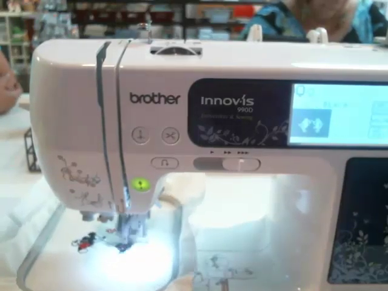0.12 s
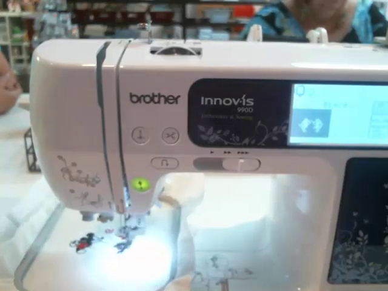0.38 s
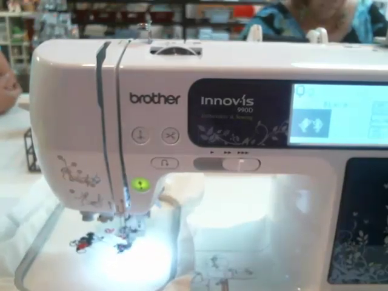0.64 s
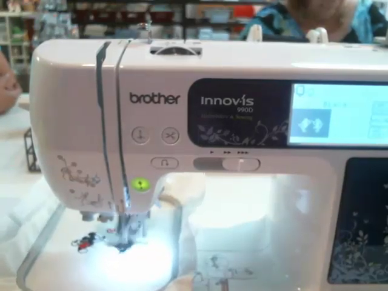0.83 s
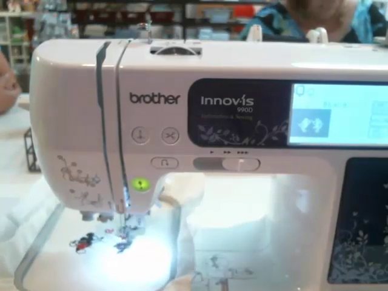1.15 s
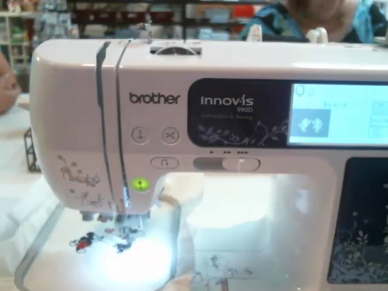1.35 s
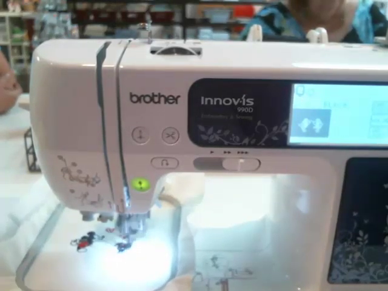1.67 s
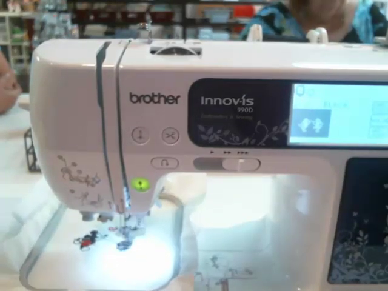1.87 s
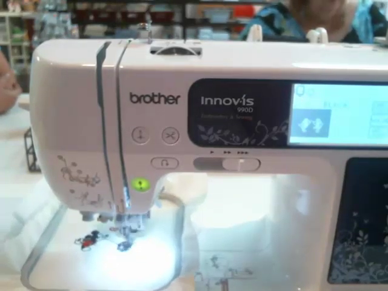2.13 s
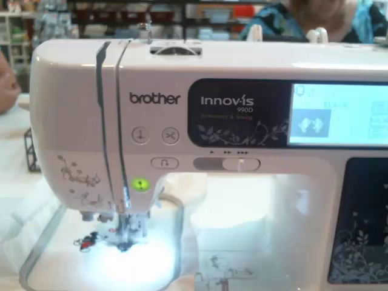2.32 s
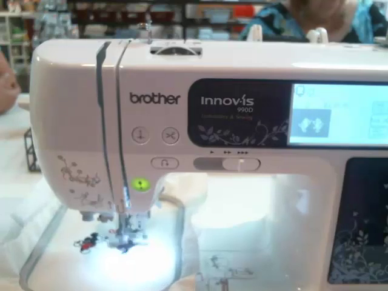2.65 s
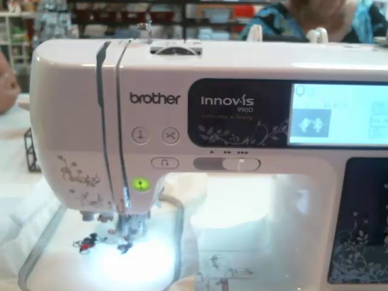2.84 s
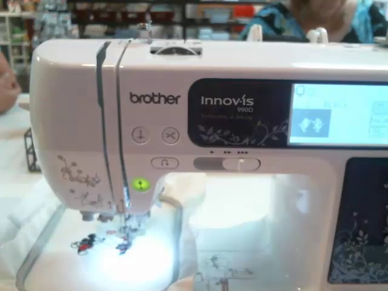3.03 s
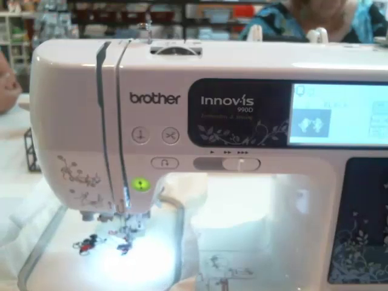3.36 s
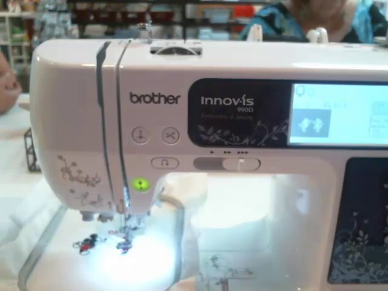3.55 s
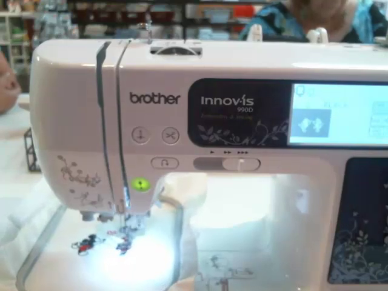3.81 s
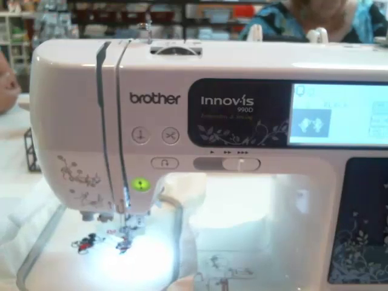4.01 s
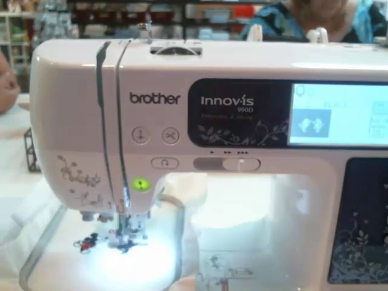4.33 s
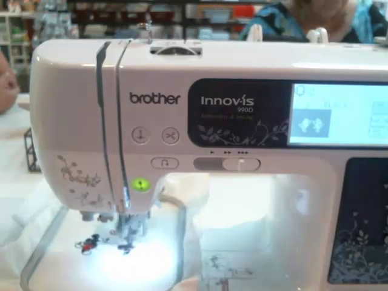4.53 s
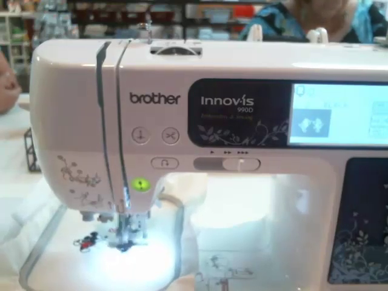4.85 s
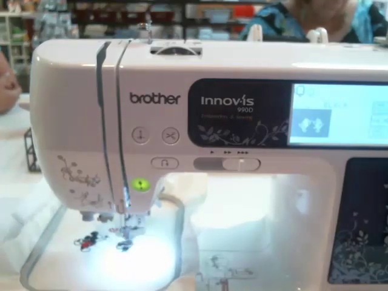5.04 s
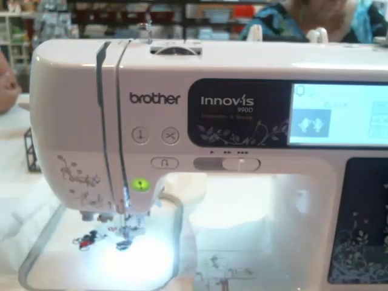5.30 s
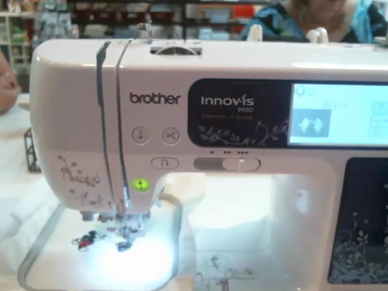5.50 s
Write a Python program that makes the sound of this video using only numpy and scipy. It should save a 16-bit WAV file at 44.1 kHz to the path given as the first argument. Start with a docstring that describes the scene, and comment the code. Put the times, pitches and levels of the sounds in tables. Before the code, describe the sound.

An embroidery machine is already stitching at the start and keeps the same fast, even pace, nearly seven stitches a second, until the end at about 5.6 seconds. Each stitch is a dull, boxy needle knock joined by a clatter of steel parts and plastic casing, and a short low growling buzz as the hoop jerks on. A steady motor whine and gear rumble run underneath, with faint irregular metallic ticks. The thread snaps tight on every stroke, more sharply around 0.1, 0.9, 1.8, 2.8, 3.9, 4.2 and 4.9 seconds. Small clicks flick against the case, most clearly near 0.5 and 2.6 seconds. A few stitches thud a little harder, near 1.1 and 2.0 seconds and especially at 4.6 seconds. The machine is heard close up in a furnished indoor room with very little echo and a faint low room tone.

```python
"""An embroidery machine sews 6.7 stitches a second, close by in a furnished studio.
On each turn of the main shaft the needle bar and foot knock, loose joints clatter in the plastic case,
the thread snaps tight and stepper motors jerk the hoop on. Bobbin, foot and thread add small ticks.
Underneath, the motor whines and the gear train rumbles throughout, over a low room tone."""
import sys
import numpy as np
from scipy import signal
from scipy.fft import rfft, irfft
from scipy.io import wavfile
from scipy.ndimage import uniform_filter1d

SR = 44100
rng = np.random.default_rng(int(sys.argv[2]) if len(sys.argv) > 2 else 0)


def pcm_store(signal):
    """Save signal as 16-bit PCM."""
    levels = np.round(np.clip(np.atleast_2d(signal), -1, 1) * 32767)
    wavfile.write(sys.argv[1], SR, levels.astype(np.int16).T)


N = 250047
TIME = np.arange(N) / SR
TURN_S, FIRST_STITCH_S = .14937, .0871  # one stitch on every turn of the shaft
STITCH_S = FIRST_STITCH_S + TURN_S * np.arange(int(N / SR / TURN_S) + 1)


def undb(db):
    """Decibels to gain."""
    return 10 ** (np.asarray(db) / 20)


def level(x, db):
    """Scale to an rms level."""
    return x * undb(db) / np.sqrt(np.mean(x ** 2))


def add(track, start_s, sound):
    """Mix a sound into a track at a time."""
    i = int(round(start_s * SR))
    lo, hi = max(i, 0), min(i + len(sound), N)
    if hi > lo:
        track[lo:hi] += sound[lo - i:hi - i]


def colour(x, points, peaks=(), size=8192):
    """EQ through (freq_hz, gain_db) points, with resonances on top."""
    f = np.maximum(np.fft.rfftfreq(size, 1 / SR), 1)
    hz, db = np.transpose(points)
    curve = np.interp(np.log(f), np.log(hz), db) - 20 * np.log10(np.maximum(hz[0] / f, 1))
    for centre, width, lift in peaks:
        curve = curve + lift / (1 + (2 * (f - centre) / width) ** 2)
    # minimum phase: nothing rings ahead of a hit
    cepstrum = irfft(np.log(undb(curve)))
    cepstrum[1:size // 2] *= 2
    cepstrum[size // 2 + 1:] = 0
    return signal.fftconvolve(x, irfft(np.exp(rfft(cepstrum))))[:N]


def turning_noise(repeat):
    """Roughness of meshing parts: the repeat share loops on every turn, the rest is new."""
    size = round(TURN_S * SR)
    turn = level(irfft(np.exp(2j * np.pi * rng.random(size // 2 + 1)), size), 0)
    return np.sqrt(repeat) * np.resize(turn, N) + np.sqrt(1 - repeat) * rng.standard_normal(N)


def burst(decay_s, rise_s, size=3000):
    """Power envelope of a loose part's bouncing: it builds up and dies away."""
    t = np.arange(size) / SR
    return (np.exp(-t / decay_s) * (1 - np.exp(-t / rise_s))) ** 2


def ping(hz, decay_s, rise_s, ring_db, q=9, size=3000):
    """One bounce of a small part, which favours one of its resonances."""
    contacts = np.sqrt(burst(decay_s, rise_s)) * rng.standard_normal(size)
    return contacts + undb(ring_db) * signal.lfilter(*signal.iirpeak(hz, q, fs=SR), contacts)


# bass-heavy EQ of the room: freq_hz, gain_db
ROOM_EQ = [(10, -24), (23, -1), (38, -12.5), (65, -11), (90, -14), (150, -20.5), (500, -23), (2000, -30.5),
           (8000, -44.5), (16000, -56)]


def room_tone():
    """The room rumbles, low and steady."""
    return colour(rng.standard_normal(N), ROOM_EQ)


# dark EQ of the gears: freq_hz, gain_db
GEAR_EQ = [(50, -15), (80, -15), (97, -5.5), (125, -5.5), (150, -5), (250, -5), (450, -7), (630, -13.5),
           (780, -13.5), (1000, -10), (1400, -25.5), (4300, -31), (10500, -43.5), (15000, -64)]
# ring of the metal parts: centre_hz, width_hz, gain_db
METAL_RING = [(1176, 45, 3), (1426, 45, 5.5), (1735, 48, 6.5), (2550, 41, 3), (2905, 67, 7), (3960, 390, 3),
              (4280, 71, 6), (6005, 190, 5.5), (7250, 210, 2.5), (9160, 180, 4.5)]
# hollow of the case, with dips where its panels cancel: centre_hz, width_hz, gain_db
CASE_HOLLOW = [(94.3, 11.4, 7), (115.5, 9.4, 10), (255, 21, 3), (402.7, 16, -10), (437, 17, 4.5),
               (632, 17, -13.5), (680, 39, -9)]


def gear_train(flicker_db=1.1):
    """Belt, cams and bearings make a bed of rumble and hiss."""
    flicker = level(uniform_filter1d(rng.standard_normal(N), size=200), 0)
    grind = turning_noise(repeat=0.3) * undb(flicker_db * flicker)
    return colour(grind, GEAR_EQ, METAL_RING + CASE_HOLLOW)


# tones of the motor and gear teeth: pitch_hz, level_db
WHINE_TONES = [(422, -10), (704, -12.5), (784, -15.5), (879, 0), (938, -10), (1004, -17.5), (1775, -25),
               (4360, -20)]


def motor_whine(catch_s=0.0655, dip_s=0.0072, slip_cycles=.25, slip_spread=0.121,
                sway=0.0049, flutter=0.0077):
    """Tooth tones sway with the load; once a turn the drive catches, and they duck and slip in phase."""
    turns = (TIME - catch_s) / TURN_S
    catches = np.floor(turns).astype(int) + 1
    from_catch_s = (turns - np.round(turns)) * TURN_S
    duck = 1 - np.exp(-(from_catch_s / dip_s) ** 2)
    shake = uniform_filter1d(uniform_filter1d(rng.standard_normal(N), size=150), size=150)
    speed = 1 + sway * np.sin(2 * np.pi * turns) + flutter * level(shake, 0)
    shaft_s = np.cumsum(speed) / SR
    whine = np.zeros(N)
    for hz, db in WHINE_TONES:
        slips = slip_cycles + slip_spread * rng.standard_normal(catches[-1] + 1)
        lag = uniform_filter1d(np.cumsum(slips)[catches], size=250)
        whine += undb(db) * np.sin(2 * np.pi * (hz * shaft_s - lag))
    return duck * whine


def rattle(power, eq, repeat):
    """Dense tiny contacts follow a power envelope and ring the metal parts."""
    return colour(np.sqrt(power) * turning_noise(repeat), eq, METAL_RING)


# bright EQ of small steel parts: freq_hz, gain_db
STEEL_EQ = [(500, -40), (1200, 2.5), (2700, 1), (3400, -3.5), (4500, -1), (7000, -3), (9000, -6.5),
            (11000, -9.5), (13000, -21), (16000, -46)]


def bobbin_ticks(count=110, scatter_db=3):
    """The bobbin jiggles in its race with faint irregular ticks."""
    power = np.zeros(N)
    for s, size in zip(rng.random(count) * N / SR, np.clip(rng.standard_normal(count), -2, 2)):
        add(power, s, undb(scatter_db * size) ** 2 * burst(decay_s=0.0031, rise_s=0.00026))
    return rattle(power, STEEL_EQ, repeat=0)


def drive_catch(catch_s=.0588, pitch_hz=425, width_s=0.005):
    """A short low buzz as the drive takes up the load before each stroke."""
    t = (TIME - catch_s + TURN_S / 2) % TURN_S - TURN_S / 2
    return np.exp(-(t / width_s) ** 2) * np.sin(2 * np.pi * pitch_hz * t)


# stitches on which the needle and hoop thud harder: start_s, boost_db
ACCENTS = [(1.133, 1.5), (2.029, 1.5), (4.568, 3.5), (4.718, 1.7)]


def accent_db(start_s):
    """Extra weight of the stitch that starts at this time."""
    return sum(db for heavy_s, db in ACCENTS if abs(heavy_s - start_s) < TURN_S / 2)


# push of the hoop's steppers within a stitch: delay_s, level_db
HOOP_ENVELOPE = [(-.012, -22.5), (0, -4.5), (.016, 1.5), (.027, 1), (0.042, -5), (.049, 5.5), (0.057, -9.5),
                 (0.067, -10), (0.086, -32)]
# low growl of the carriage: freq_hz, gain_db
HOOP_EQ = [(50, -28.5), (80, -26), (97, -3), (160, -11), (240, -4.5), (300, 0), (380, 2.5), (480, -8),
           (560, -2), (660, -22), (1000, -8.5), (1500, -56.5)]


def hoop_steps(moves_db):
    """The steppers jerk the hoop to the next point and its carriage growls."""
    drive = np.zeros(N)
    delay, db = np.transpose(HOOP_ENVELOPE)
    move = undb(np.interp(np.arange(delay[0], delay[-1], 1 / SR), delay, db))
    for s, hoop_db in zip(STITCH_S, moves_db):
        add(drive, s + delay[0], undb(hoop_db) * move)
    return colour(drive * turning_noise(repeat=0.21), HOOP_EQ, CASE_HOLLOW)


# joints that chatter on every stitch: delay_s, rattle_db, click_db, decay_s
LOOSE_JOINTS = [(-.009, -7.5, -17.5, 0.0059), (-.002, -11, -15, .005), (.0005, 2, 3, 0.005),
                (.006, 1, -3, 0.0065), (.0095, 1.5, 4.5, 0.0071), (0.0126, -2.5, -5, 0.012),
                (.022, -6, 0, 0.013), (0.033, -4.5, -7, 0.0081), (0.042, 1.5, -8.5, 0.0059),
                (0.061, -24, -4, 0.0014), (.068, -7.5, -28, 0.0036), (.076, -32, -22, 0.0025),
                (.099, -37, -12, 0.0017), (0.124, -8, -36, 0.0071)]
# slow level ride on the clatter: time_s, level_db
CLATTER_RIDE = [(.1, 2), (.5, 3.3), (.9, -0.7), (1.6, 4), (2.4, 0.5), (3.4, 1.4), (4.8, 3), (5.6, 0.5)]
# boxy EQ of the plastic case: freq_hz, gain_db
PLASTIC_EQ = [(200, -21), (400, 2), (700, -3), (1050, 2), (1400, -5.5), (2000, -3), (2800, -2.5),
              (3300, -11), (4300, -7), (5200, -10.5), (7000, -25), (10500, -41), (13000, -74), (16000, -75)]


def linkage_clatter(scatter_db=2.86, jitter_s=0.00024, steel_db=-3):
    """Each joint takes up its play once a turn: steel clicks at once, the plastic case rattles after."""
    plastic, steel = np.zeros(N), np.zeros(N)
    for s, ride_db in zip(STITCH_S, np.interp(STITCH_S, *np.transpose(CLATTER_RIDE))):
        for delay, rattle_db, click_db, decay_s in LOOSE_JOINTS:
            size, late = rng.standard_normal(2)
            start_s, db = s + delay + jitter_s * late, ride_db + scatter_db * size
            add(plastic, start_s, undb(db + rattle_db) ** 2 * burst(decay_s, rise_s=0.0029))
            add(steel, start_s, undb(db + click_db) ** 2 * burst(decay_s, rise_s=0.00095))
    case_rattle = level(rattle(plastic, PLASTIC_EQ, repeat=0.14), 0)
    return case_rattle + level(rattle(steel, STEEL_EQ, repeat=0.21), steel_db)


# the presser foot's landing and lift in every stitch: delay_s, level_db
FOOT_HITS = [(.0008, 2), (0.0448, -4)]
# thin, airy EQ of its ticks: freq_hz, gain_db
FOOT_EQ = [(2000, -26), (7000, -5), (10500, 2), (12400, -6), (14200, -10), (16000, -26)]


def foot_ticks(scatter_db=2, decay_s=0.0032, rise_s=.0013):
    """The presser foot gives a bright tick as it lands on the cloth and as it lifts."""
    power = np.zeros(N)
    for s in STITCH_S:
        for (delay, db), size in zip(FOOT_HITS, rng.standard_normal(len(FOOT_HITS))):
            add(power, s + delay, undb(db + scatter_db * size) ** 2 * burst(decay_s, rise_s))
    return rattle(power, FOOT_EQ, repeat=.2)


# blows of the linkage in every stitch: delay_s, level_db, contact_s
BLOWS = [(.0022, -9.5, 0.0011), (.0058, -1.5, 0.00091), (0.0101, -3, 0.00071), (0.0237, -9, 0.002),
         (0.043, -6.5, .001), (.0510, -13.5, 0.00058)]
# ringing modes of the arm and bed: pitch_hz, level_db, t60_s
BODY_MODES = [(100, -4.5, 0.52), (122.6, -21, 0.47), (202, -5.5, 0.092), (247.8, 1, 0.13),
              (282, -3.5, 0.066), (319, 8, 0.074), (357.3, 1.5, 0.26), (442, -8, 0.082), (446, -18, 0.19),
              (550, 1, 0.022), (649.3, -2.5, 0.13), (718, -7, 0.12), (770, -10, 0.017), (920, 4, 0.014),
              (1095, -13, 0.029)]


def needle_knocks(scatter_db=0.4, stitch_scatter_db=1.3, jitter_s=0.0001, rise_s=0.00039, low_cut_hz=85):
    """Needle bar, foot and take-up lever knock the arm at set shaft angles, and its modes ring."""
    force, t = np.zeros(N), np.arange(SR // 3) / SR
    for s in STITCH_S:
        stitch_db = accent_db(s) + stitch_scatter_db * rng.standard_normal()
        for delay, db, contact_s in BLOWS:
            size, late = rng.standard_normal(2)
            push = np.sin(np.pi * np.minimum(t[:SR // 100] / contact_s, 1)) ** 2 / contact_s
            add(force, s + delay + jitter_s * late, undb(stitch_db + db + scatter_db * size) * push)
    ring = sum(undb(db) * np.exp(-np.log(1000) * t / t60) * np.sin(2 * np.pi * hz * t)
               for hz, db, t60 in BODY_MODES)
    # the blow takes a moment to spread over the panels, which are too small to radiate deep bass
    ring *= 1 - np.exp(-t / rise_s)
    ring = signal.sosfilt(signal.butter(4, low_cut_hz, "high", fs=SR, output="sos"), ring)
    return signal.fftconvolve(force, ring)[:N]


# chirp of the hoop's steppers within a stitch: delay_s, pitch_hz, level_db
STEPPER_GLIDE = [(.010, 329.7, -33), (0.019, 336, -2), (0.03, 239.8, 0), (.038, 280.6, -4),
                 (.047, 386.4, -1), (0.054, 526, -3), (0.064, 563, -44)]


def stepper_tone(moves_db, speed_spread=0.0822):
    """The step rate sags, then glides up; it differs with the length of each stitch."""
    tone = np.zeros(N)
    delay, hz, db = np.transpose(STEPPER_GLIDE)
    t = np.arange(delay[0], delay[-1], 1 / SR)
    steps = np.cumsum(np.interp(t, delay, hz)) / SR
    envelope = undb(np.interp(t, delay, db))
    for s, hoop_db in zip(STITCH_S, moves_db):
        speed = 1 + speed_spread * rng.standard_normal()
        add(tone, s + delay[0], undb(hoop_db) * envelope * np.sin(2 * np.pi * steps * speed))
    return tone


# hard snaps, each in place of its stitch's usual one: start_s, level_db, pitch_hz
SNAP_ACCENTS = [(.116, 8, 6700), (0.567, 5.5, 6620), (.860, 8.5, 5900), (1.609, 3.5, 4010),
                (1.761, 11.5, 2930), (2.810, 11, 5500), (3.404, 6, 7230), (3.852, 8.5, 6900),
                (3.994, 7, 4280), (4.157, 9, 2940), (4.3, 4, 7450), (4.898, 8, 2880), (5.047, 6, 7060)]


def thread_snaps(delay_s=0.029, jitter_s=.005, scatter_db=4.0, ring_hz=3900, spread_octaves=0.72):
    """On each stitch the loop slips off the hook and is pulled tight, ringing a guide or spring."""
    hits = np.zeros(N)
    for s in STITCH_S:
        late, size, pitch = np.clip(rng.standard_normal(3), -2, 2)
        usual = (s + delay_s + jitter_s * late, scatter_db * size, ring_hz * 2 ** (spread_octaves * pitch))
        start_s, db, hz = next((snap for snap in SNAP_ACCENTS if s < snap[0] < s + TURN_S), usual)
        add(hits, start_s, undb(db) * ping(hz, decay_s=0.007, rise_s=0.0016, ring_db=5))
    return colour(hits, STEEL_EQ)


# the loudest flicks against the case: start_s, level_db, pitch_hz
LOUD_FLICKS = [(0.452, -6, 4220), (2.6205, -4, 4290), (3.219, -8, 4400), (4.113, -9, 3090)]


def stray_clicks(faint_count=12, faint_db=-12, scatter_db=1.5, ring_hz=3400, spread_octaves=.35):
    """Now and then the thread or the hoop flicks against the case, mostly faintly."""
    hits, flicks = np.zeros(N), list(LOUD_FLICKS)
    for s in rng.random(faint_count) * N / SR:
        size, pitch = np.clip(rng.standard_normal(2), -2, 2)
        flicks.append((s, faint_db + scatter_db * size, ring_hz * 2 ** (spread_octaves * pitch)))
    for s, db, hz in flicks:
        add(hits, s, undb(db) * ping(hz, decay_s=0.012, rise_s=0.001, ring_db=1))
    eq = [(400, -22), (900, 3), (2500, -5.0), (4500, -6.5), (8000, -13.5), (12000, -27), (16000, -42)]
    return colour(hits, eq)


def studio(x, t60_s=0.25, wet_db=-18, predelay_s=.004):
    """The table and shelves add a short diffuse echo."""
    t = np.arange(SR // 2) / SR
    tail = rng.standard_normal(len(t)) * np.exp(-np.log(1000) * t / t60_s) * (t > predelay_s)
    echo = signal.fftconvolve(x, tail / np.sqrt(np.sum(tail ** 2)))[:N]
    return x + undb(wet_db) * colour(echo, [(80, -5), (1000, -1), (4000, -3), (12000, -28)])


def scene(move_scatter_db=.5):
    """Mono mix of thuds and clicks over the drive and room tone; each hoop move has its own weight."""
    moves_db = [accent_db(s) + move_scatter_db * rng.standard_normal() for s in STITCH_S]
    thuds = level(needle_knocks(), -48.0) + level(hoop_steps(moves_db), -48.0)
    thuds += level(stepper_tone(moves_db), -51.0)
    clicks = level(linkage_clatter(), -52.5) + level(thread_snaps(), -62.5)
    clicks += level(stray_clicks(), -66.0) + level(bobbin_ticks(), -69.5) + level(foot_ticks(), -72.5)
    drive = level(motor_whine(), -53.5) + level(drive_catch(), -63.0) + level(gear_train(), -49.0)
    return (studio(thuds + clicks) + drive + level(room_tone(), -60.0))[None]


def record(dry, top_hz=16800):
    """A steep high cut takes off the very top."""
    return signal.sosfilt(signal.ellip(8, .2, 70, top_hz, fs=SR, output="sos"), dry)


dry = scene()
out = record(dry)
pcm_store(out)
```